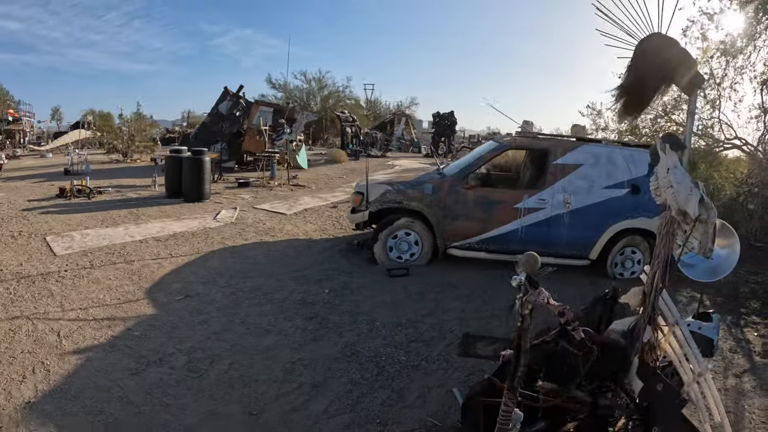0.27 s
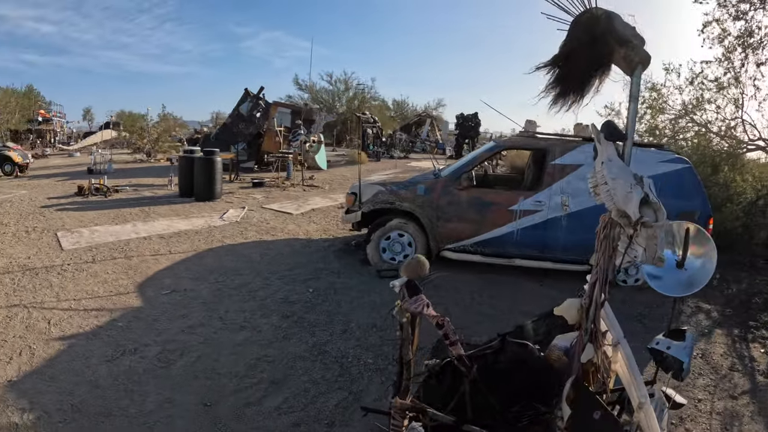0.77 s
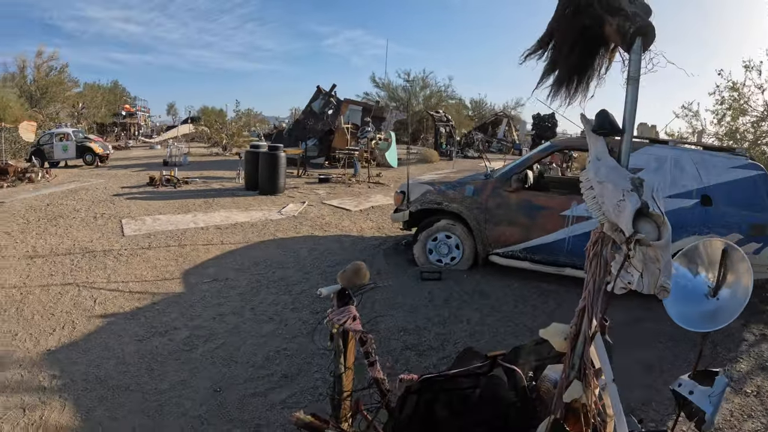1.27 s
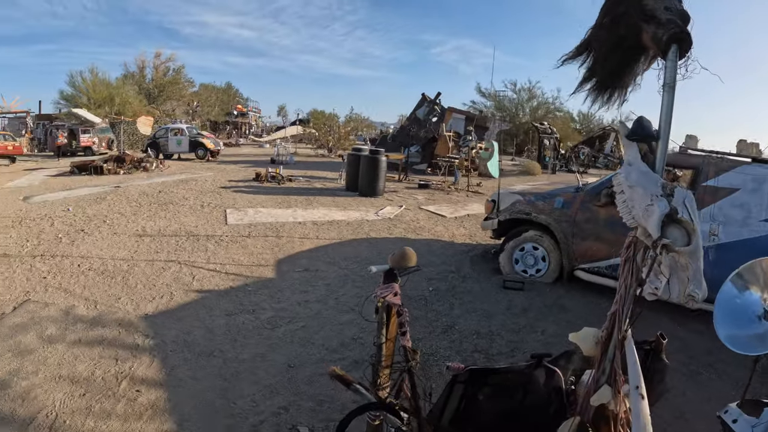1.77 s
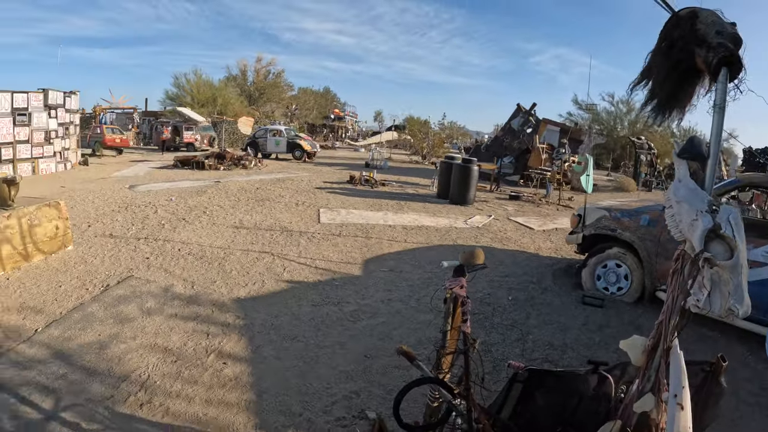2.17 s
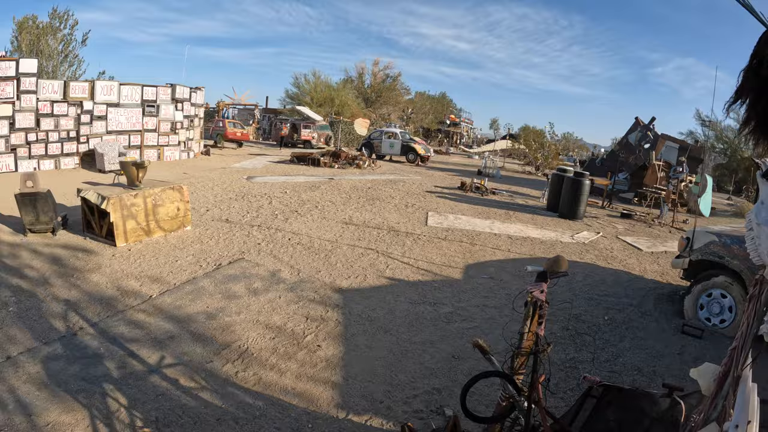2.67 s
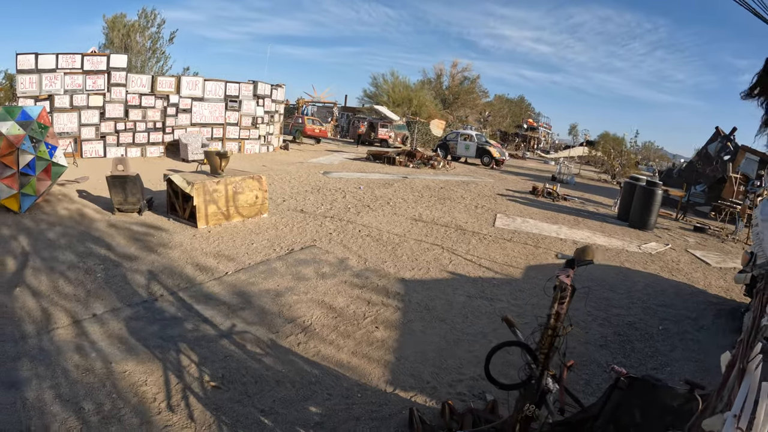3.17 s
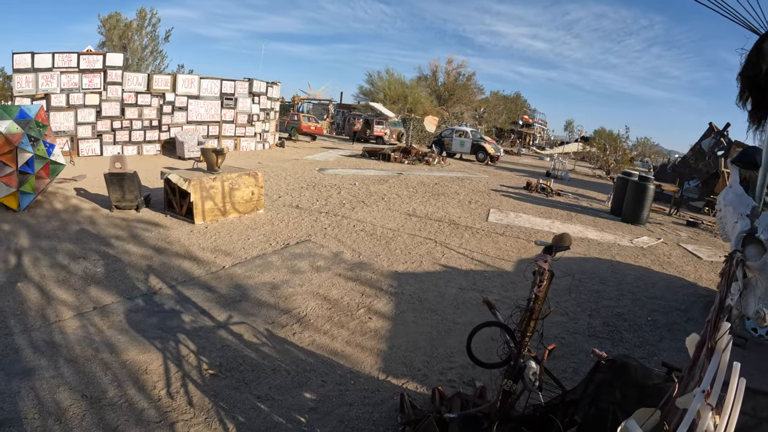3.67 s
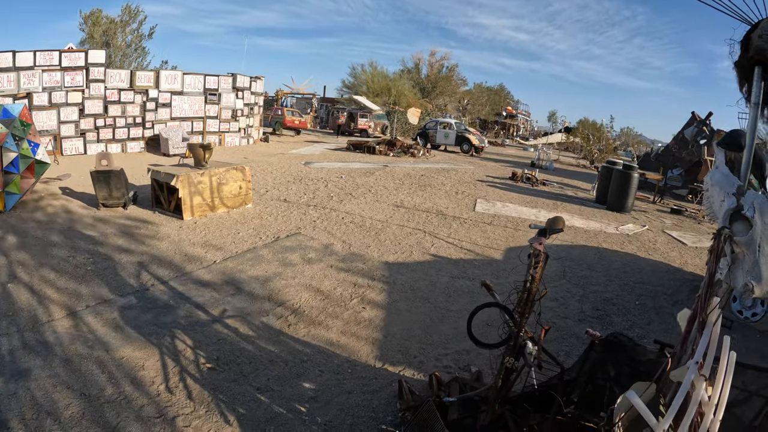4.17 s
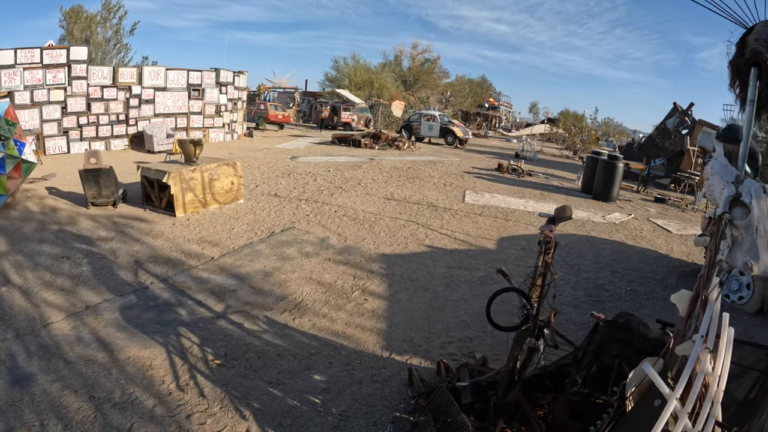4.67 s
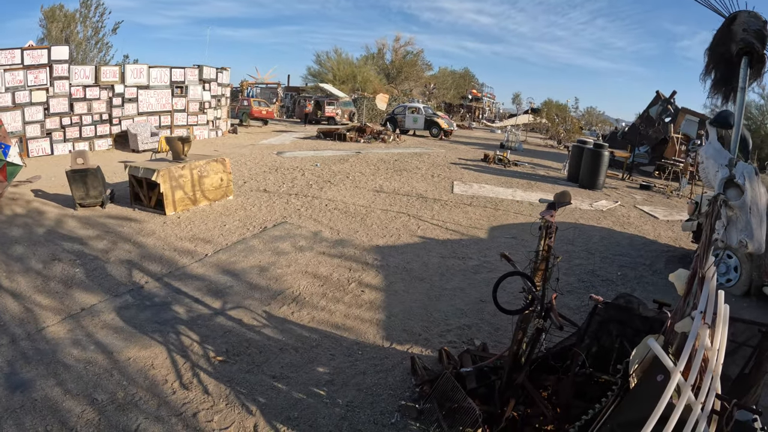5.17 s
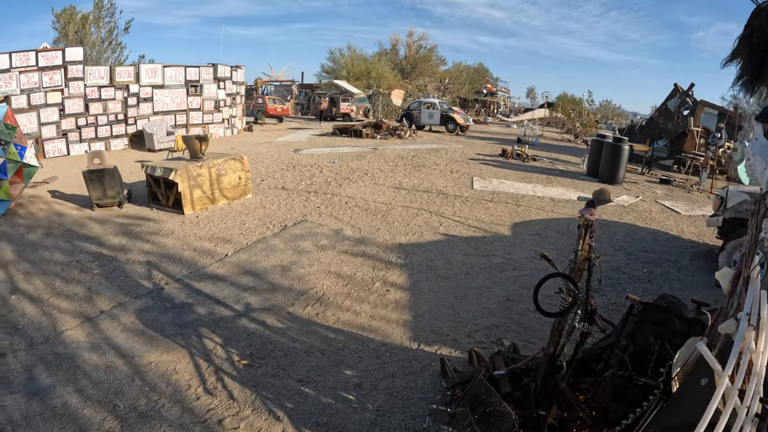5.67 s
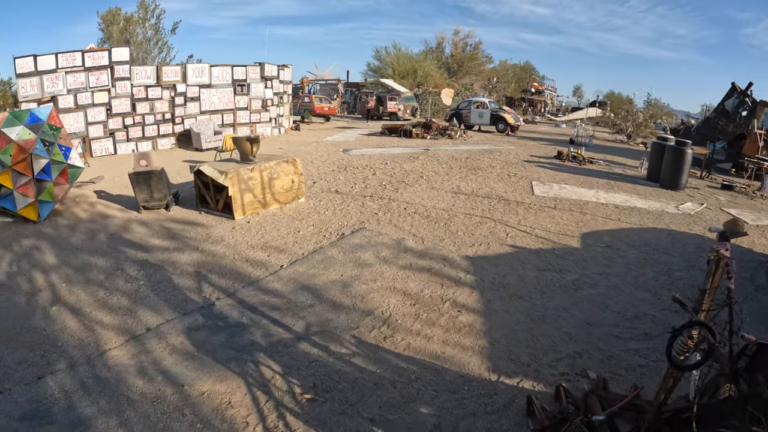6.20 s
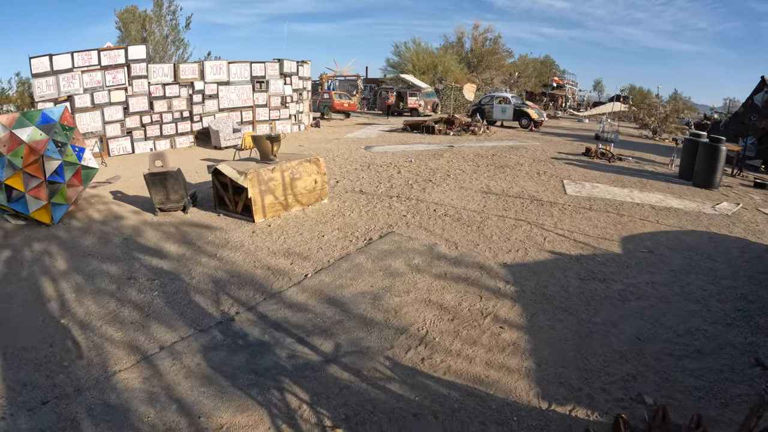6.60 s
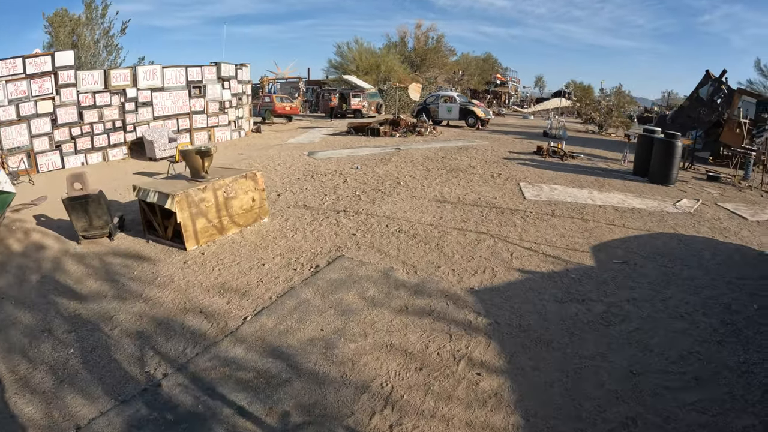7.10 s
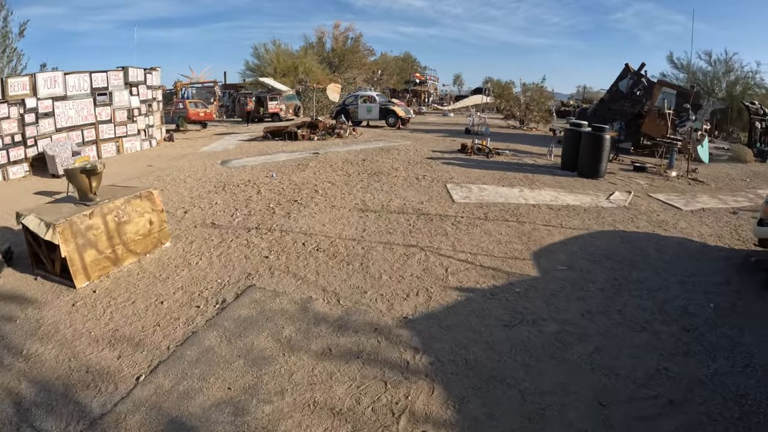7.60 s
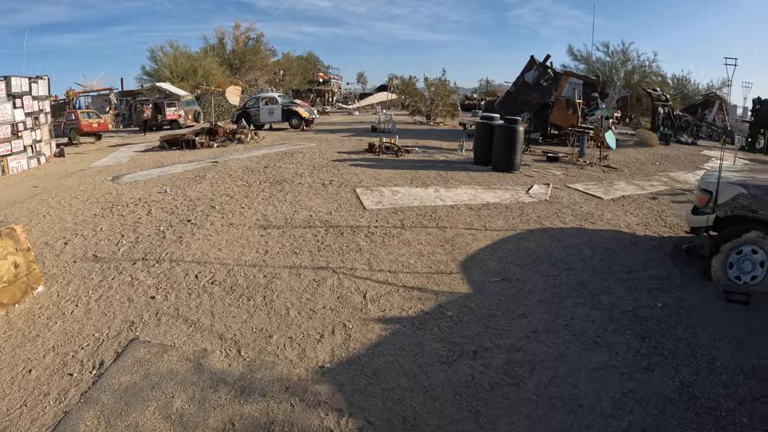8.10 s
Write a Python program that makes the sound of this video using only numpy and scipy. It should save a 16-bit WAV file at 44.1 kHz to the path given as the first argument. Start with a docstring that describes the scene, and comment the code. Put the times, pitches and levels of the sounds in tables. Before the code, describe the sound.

Someone walks slowly on gritty desert gravel, stones clicking underfoot, as low wind buffets the microphone and a bird calls sparsely.

```python
"""Someone walks slowly over dry desert gravel with a hand-held camera; gusts buffet its microphone.
From the start the wind rumbles (low noise), soles scuff the grit (clumped impulses) and small hard things
clack and click (noise bursts, ringing modes), most densely at first. After a second eddies slap the
microphone (short pressure swings). From two seconds on a bird chips now and then (gliding tones) and a
dragged sole rasps (noise bands); later come a faint far twitter and two thin whistles, over steady air noise."""
import sys
import numpy as np
from scipy import signal
from scipy.fft import rfft, irfft, next_fast_len
from scipy.io import wavfile
from scipy.ndimage import uniform_filter1d, map_coordinates

SR = 44100
rng = np.random.default_rng(int(sys.argv[2]) if len(sys.argv) > 2 else 0)


def waveform_to_disk(signal):
    """Save audio, clipped to [-1, 1], as 16-bit WAV at the path in sys.argv[1]."""
    frames = np.transpose(np.atleast_2d(signal))
    scaled = np.clip(frames, -1, 1) * 32767
    samples = np.round(scaled).astype(np.int16)
    wavfile.write(sys.argv[1], SR, samples)


N = 368058


def amp(db):
    """Decibels to an amplitude ratio."""
    return 10 ** (np.asarray(db) / 20)


def unit(x):
    """Normalisation to rms 1."""
    return x / np.sqrt(np.mean(x ** 2) + 1e-20)


def along(points, hz):
    """Interpolation of (Hz, value) points on a logarithmic frequency axis."""
    f, v = np.transpose(points)
    return np.interp(np.log(hz + 1), np.log(f + 1), v)


def curves(rows):
    """Linear interpolation in time: one value per sample for each column after the time."""
    s, *cols = np.transpose(rows)
    return [np.interp(np.arange(N) / SR, s, c) for c in cols]


def wobble(rate):
    """Band-limited random modulation: a smooth curve through rate random knots a second."""
    knots = rng.standard_normal(int(N * rate / SR) + 4)
    return map_coordinates(knots, [np.arange(N) * rate / SR])


def filtered(x, response):
    """Linear filtering: the spectrum of x times a response of frequency."""
    m = next_fast_len(len(x) + 8192)
    return irfft(rfft(x, m) * response(np.fft.rfftfreq(m, 1 / SR)), m)[:len(x)]


def coloured(x, spectrum):
    """Spectral shaping of x by (Hz, dB) points, at rms 1."""
    return unit(filtered(x, lambda hz: amp(along(spectrum, hz))))


def band(size, centre_hz, octaves):
    """Band-limited noise: a bell on the octave axis, at rms 1."""
    def bell(hz):
        return np.exp(-.5 * (np.log2((hz + 1) / centre_hz) / octaves) ** 2)
    return unit(filtered(rng.standard_normal(size), bell))


def steady(x, seconds):
    """Automatic levelling: division by the running rms evens out swells slower than the window."""
    size = max(int(seconds * SR), 8)
    power = uniform_filter1d(uniform_filter1d(x * x, size), size)
    return x / np.sqrt(np.abs(power) + 1e-12)


def add(track, s, sound):
    """Superposition: mix a sound into the track at s seconds."""
    part = track[max(round(s * SR), 0):][:len(sound)]
    part += sound[:len(part)]


def grains(rate, spread_db):
    """Shot noise: random impulses, on average rate a second, with a log-normal spread of size."""
    hits = rng.random(N) < rate / SR
    return hits * rng.standard_normal(N) * amp(spread_db * rng.standard_normal(N))


def swell(s, hold_s, attack_s, release_s):
    """Exponential envelope with two time constants: rises to 1 at s, holds and dies away."""
    t = np.arange(N) / SR - s
    rise = np.minimum(t, 0) / attack_s
    fall = np.maximum(t - hold_s, 0) / release_s
    return np.exp(np.maximum(rise - fall, -20))


def note(length, start_hz, end_hz, rough, overtones_db=()):
    """Harmonic tone with frequency modulation: a quick glide that settles, with a tremor in its pitch."""
    u = np.linspace(0, 1, max(int(length * SR), 64))
    tremor = unit(uniform_filter1d(rng.standard_normal(len(u)), size=40))
    glide_hz = end_hz + (start_hz - end_hz) * (1 - u) ** 2
    phase = 2 * np.pi * np.cumsum(glide_hz * (1 + rough * tremor)) / SR
    voice = np.sin(phase) + sum(amp(db) * np.sin(k * phase) for k, db in enumerate(overtones_db, 2))
    return np.sqrt(np.abs(np.sin(np.pi * u))) * voice


def wind():
    """Turbulence: large eddies rumble with the wind; gusts shed smaller ones in sharper flurries."""
    # Wind rumble apart from gusts. Each row: time in seconds, rms level in dB.
    wind_rows = [(0.0, -23), (0.04, -20), (0.6, -22), (0.76, -27), (0.93, -23), (1.04, -20.5), (2.0, -18),
                 (2.46, -23), (3.16, -19), (4.55, -20.5), (5.02, -17.5), (5.07, -29), (5.13, -17.5),
                 (5.46, -27.5), (5.67, -17), (5.95, -38), (6.04, -19), (6.83, -28), (7.25, -17),
                 (7.41, -23.5), (7.65, -19), (7.84, -34.5), (8.03, -35.5), (8.21, -26.5), (8.35, -41)]
    # Gusts at the microphone. Each row: start of the hold in seconds, hold in seconds, buffet level in dB,
    # sharpness in dB (small eddies against the buffet).
    gust_rows = [(0.169, 0.041, -20.5, -16), (0.24, 0.13, -32.5, -15.5), (0.575, 0.02, -29.5, -27),
                 (0.941, 0.25, -32.5, -10.5), (1.269, 0.079, -24, -11), (1.363, 0.05, -27.5, -11),
                 (1.42, 0.055, -20.5, -8.5), (1.5, 0.022, -22, -15), (1.554, 0.011, -23.5, -4),
                 (1.667, 0.041, -30, -11), (1.761, 0.02, -20, -10.5), (1.808, 0.03, -23.5, -9.5),
                 (1.964, 0.024, -21, -10.5), (2.01, 0.038, -24, -13.5), (2.063, 0.11, -26.5, -24),
                 (2.152, 0.028, -20, -12), (2.391, 0.062, -26.5, -22.5), (2.716, 0.15, -33.5, -29),
                 (2.884, 0.012, -22, -29.5), (3.032, 0.057, -20.5, -10), (3.138, 0.037, -21.5, -13.5),
                 (3.239, 0.033, -22.5, -14), (3.359, .1, -28.5, -40), (3.544, 0.47, -31.5, -29),
                 (3.693, 0.0056, -22, -16), (3.835, 0.07, -24.5, -19), (4.168, 0.18, -31.5, -24),
                 (4.361, 0.18, -26, -27), (4.638, 0.019, -25, -9), (4.835, 0.054, -21, -14),
                 (4.954, 0.041, -22.5, -11), (5.096, 0.024, -32.5, -23), (5.18, 0.02, -35.5, -21),
                 (5.273, 0.009, -29.5, -9.5), (5.585, 0.0082, -28, -25), (5.692, 0.038, -28, -25),
                 (6.129, 0.11, -23, -14), (6.222, 0.061, -21, -5.5), (6.293, 0.073, -20, -15),
                 (6.39, 0.041, -25, -22), (7.028, 0.18, -25.5, -23), (7.188, 0.11, -19.5, -15.5),
                 (7.485, 0.16, -25.5, -29)]
    # Shape of the rumble spectrum. Each row: frequency in Hz, relative density in dB.
    rumble_shape = [(5, -4), (18, -2), (30, 3), (60, -3), (105, -4), (140, -11), (220, -45), (400, -120)]
    # Eddy sizes. Each row: centre in Hz, level in dB against the buffet, factor on the sharpness,
    # flutter in dB per unit of the flutter curve.
    eddy_rows = [(152.8, -4, -0.2, 5.5), (246, -1.5, 0.2, 5), (400, -1, 0.5, 5), (750, -2, 1.24, 6.5),
                 (1020, -5, 1.32, 9), (1950, -25, 3.5, 6)]
    attack_s, release_s = 0.013, 0.03
    small_eddies_fade = 0.86  # dB of sharpness lost per dB of a gust's fade
    usual_wind_db, breeze_db, breeze_growth = -22, -36.5, 1.28  # growth in dB per dB of wind
    breeze_sharp_db = -28.5
    levelling_cycles = 17  # large eddies keep longer flurries than small ones

    wind_db, = curves(wind_rows)
    # between gusts the buffeting follows the wind
    breeze_db = breeze_db + breeze_growth * (wind_db - usual_wind_db)
    # the strongest gust of the moment sets the buffeting and its sharpness
    gust_db, gust_sharp_db = np.full(N, -200.), np.zeros(N)
    for s, hold_s, db, sharp_db in gust_rows:
        fade_db = 20 * np.log10(swell(s, hold_s, attack_s, release_s))
        stronger = db + fade_db > gust_db
        gust_sharp_db = np.where(stronger, sharp_db + small_eddies_fade * fade_db, gust_sharp_db)
        gust_db = np.maximum(gust_db, db + fade_db)
    gust_sharp_db = uniform_filter1d(gust_sharp_db, size=SR // 100)  # one gust blends into the next

    rumble = steady(coloured(rng.standard_normal(N), rumble_shape), 0.091)
    out = np.hypot(amp(wind_db), amp(gust_db - 3)) * rumble  # gusts rumble 3 dB below their buffet
    flurry = unit(.6 * wobble(25) + .8 * wobble(70) + wobble(240))
    flurry = 2 * np.tanh(flurry / 1.8)  # limits the extremes
    for hz, db, share, flutter_db in eddy_rows:
        flutter = 0.89 * flurry + 0.51 * wobble(200)
        eddies = band(N, hz, octaves=0.49) * amp(flutter_db * flutter)
        breeze = amp(breeze_db + share * breeze_sharp_db)
        gust = amp(gust_db + share * gust_sharp_db)
        out += amp(db) * np.hypot(breeze, gust) * steady(eddies, levelling_cycles / hz)
    return out


def slaps():
    """Vortex passage: a tight eddy crosses the microphone port as one brief swing of pressure."""
    # Strongest single eddies. Each row: centre in seconds, envelope peak in dB, pitch in Hz.
    slap_rows = [(1.294, -10.5, 440), (1.429, -11, 400), (1.44, -8, 480), (1.455, -14, 530),
                 (1.476, -8, 650), (1.538, -15.5, 660), (1.561, -22, 520), (1.569, -20, 910),
                 (1.702, -19.5, 473), (1.751, -20, 480), (1.766, -25, 470), (1.78, -10, 550),
                 (1.805, -17.5, 630), (1.824, -18, 510), (1.837, -27, 520), (1.867, -13.5, 460),
                 (1.966, -18, 480), (1.977, -14, 540), (2.013, -19, 730), (2.167, -12.5, 460),
                 (2.779, -20, 394), (2.892, -20, 400), (3.046, -10.5, 630), (3.076, -22, 483),
                 (3.148, -16, 500), (3.176, -15, 480), (3.245, -16, 520), (3.689, -22, 484),
                 (3.7, -10, 400), (3.743, -28, 400), (3.86, -31, 750), (3.886, -12.5, 450),
                 (3.969, -24, 446), (4.237, -30, 1100), (4.37, -12, 244), (4.449, -19.5, 410),
                 (4.537, -22, 420), (4.647, -30, 450), (4.678, -15, 480), (4.797, -24, 1400),
                 (4.836, -20, 420), (4.893, -16, 960), (4.9, -15.5, 520), (4.951, -24, 1200),
                 (4.971, -13, 450), (4.996, -19, 654), (5.04, -25, 1140), (5.206, -24.5, 400),
                 (5.279, -21.5, 576), (5.543, -25.5, 464), (5.596, -19.5, 400), (5.69, -19, 418),
                 (6.157, -10, 540), (6.234, -20, 700), (6.366, -13.5, 593), (6.438, -23.5, 1200),
                 (7.141, -15, 377), (7.263, -11, 455), (7.275, -13, 507), (7.58, -25, 520)]
    life = 0.27  # width of the envelope in cycles
    out, t = np.zeros(N), np.arange(-SR // 50, SR // 50) / SR
    for (s, peak_db, hz), phase in zip(slap_rows, rng.random(len(slap_rows))):
        cycles = t * hz
        swing = np.cos(2 * np.pi * (cycles + phase)) / np.cosh(cycles / life)
        add(out, s + t[0], amp(peak_db) * swing)
    return out


def gravel():
    """Granular friction: each step grinds coarse stones and fine grit, whose grains slip in clumps."""
    # Steps and shuffles. Each row: start of the hold in seconds, hold in seconds,
    # scuff in dB and fine grit in dB, both before the gains below.
    step_rows = [(0.01, 0.53, -56, -56.5), (0.503, 0.5, -51.5, -55.5), (0.98, 0.23, -46.5, -51),
                 (1.225, 0.18, -49.5, -51), (1.643, .08, -56.5, -59.5), (1.765, 0.12, -51.5, -59.5),
                 (2.16, 0.096, -52, -64), (2.352, 0.26, -53.5, -62), (2.767, 0.22, -54, -61.5),
                 (3.038, 0.31, -56.5, -63.5), (3.754, 0.28, -72, -62), (4.305, 0.029, -68, -57),
                 (4.372, 0.1, -53.5, -58.5), (4.65, .33, -55.5, -63.5), (5.23, 0.095, -60, -62.5),
                 (5.467, 0.14, -61, -63), (5.67, 0.19, -56.5, -59), (6.026, 0.15, -54, -59.5),
                 (6.174, 0.18, -56.5, -69), (6.641, 0.069, -55.5, -64), (6.811, 0.15, -52, -60.5),
                 (7.004, 0.365, -56, -64), (7.5, 0.17, -53.5, -70), (8.026, 0.092, -56.5, -70),
                 (8.203, 0.1, -48.5, -59.5)]
    # Spectrum of the coarse scuff. Each row: frequency in Hz, relative density in dB.
    scuff_shape = [(150, -35.5), (400, 0), (850, 0.5), (1400, -1), (2000, -6), (2600, -6), (3400, -12.5),
                   (4500, -23.5), (7000, -34), (12000, -51)]
    # Spectrum of the fine grit. Each row: frequency in Hz, relative density in dB.
    grit_shape = [(1200, -41.5), (2400, -0.5), (3200, 1), (4300, -2.5), (6000, -9.5), (8000, -18),
                  (10000, -30), (13000, -44.5)]
    scuff_gain_db, grit_gain_db = 9.0, 4.0
    attack_s, release_s = 0.04, 0.077  # the weight comes on, the stones settle
    # gravel creeps under the walker's weight between steps
    on_stones, on_grit = np.full(N, amp(-62)), np.full(N, amp(-65.5))
    for s, hold_s, coarse_db, fine_db in step_rows:
        weight = swell(s, hold_s, attack_s, release_s)
        on_stones = np.maximum(on_stones, amp(coarse_db) * weight)
        on_grit = np.maximum(on_grit, amp(fine_db) * weight)
    clumps = wobble(55)
    coarse = coloured(grains(rate=3200, spread_db=0.0) * amp(clumps), scuff_shape)
    fine = coloured(grains(rate=8300, spread_db=2.5) * amp(2.1 * clumps + 0.7 * wobble(120)), grit_shape)
    return amp(scuff_gain_db) * on_stones * coarse + amp(grit_gain_db) * on_grit * fine


def rasps():
    """Stick-slip friction: a dragged sole chatters over the stones and lets go."""
    # Brief rasps. Each row: centre in seconds, length in seconds (between the 1/e points),
    # level in dB before the chatter, centre frequency in Hz.
    rasp_rows = [(2.24, 0.081, -50.5, 2360), (2.446, 0.023, -44, 1700), (2.836, 0.072, -43, 1110),
                 (2.928, 0.042, -49, 2080), (3.282, 0.052, -32, 1000), (3.312, 0.039, -32.5, 1260),
                 (4.546, 0.054, -39, 1230), (5.057, 0.038, -46.5, 1680), (6.046, 0.078, -40.5, 1600),
                 (6.127, 0.086, -45.5, 2380), (6.235, 0.04, -39.5, 1460), (6.281, 0.047, -44, 1240),
                 (6.927, 0.064, -39.5, 1000), (7.867, 0.012, -40.5, 1100), (8.197, 0.022, -34.5, 1300),
                 (8.256, 0.15, -40, 800)]
    out, t = np.zeros(N), np.arange(-SR // 6, SR // 6) / SR
    chatter = amp(3.2 * wobble(320) - 1.3)
    for s, length, db, hz in rasp_rows:
        bell = np.exp(-(2 * t / length) ** 2)
        add(out, s + t[0], amp(db) * bell * band(len(t), hz, octaves=.68))
    return out * chatter


def clacks():
    """Impact excitation of modes: a quick chatter of contacts cracks and rings briefly."""
    # Hard clacks underfoot. Each row: start in seconds, reference level in dB, knock in dB,
    # brightness in dB, ring in dB against the reference, pitch of the ring in Hz.
    clack_rows = [(0.058, -34, -5, -18, -19, 3240), (0.082, -39, -16, -22, -8, 3020),
                  (0.161, -39.5, -21, -11, -11, 4200), (0.273, -37.5, -22, -13, -13, 4370),
                  (0.328, -45.5, -20, -13, -18, 4280), (0.422, -44.5, -7, -6, -20, 3170),
                  (0.518, -33, -18, -14, -18, 3130), (0.541, -31, -4, -25, -10, 3140),
                  (0.636, -37, -28, -14.5, -9, 3450), (0.697, -43, -14, -19, -11, 3150),
                  (0.736, -35, -9, -15.5, -21, 3200), (0.856, -26, -1, -17, -11.5, 3120),
                  (0.959, -35.5, -12, -9, -19, 3130), (1.028, -30.5, -34, -18, -20, 3200),
                  (1.071, -28.5, -24, -21, -16, 3060), (1.139, -22.5, -4.5, -26.5, -21, 3150),
                  (1.177, -29, -23, -22, -16, 3090), (1.275, -35.5, -22, -13.5, -14, 3430),
                  (1.302, -48, -19, -6, -13, 3110), (1.627, -38.5, 8.5, -25, -24, 3130),
                  (1.675, -44, -12.5, -4, -19, 3110), (1.808, -51, -6, -3, -11, 3110),
                  (1.925, -30, -3, -21.5, -10.5, 3370), (2.275, -32.5, 4, -20, -8, 2960),
                  (2.352, -36, -8, -32, -14, 3120), (2.481, -37.5, -2, -29, -18, 3160),
                  (2.731, -28, 3.5, -18, -10.5, 3170), (3.057, -34.5, -5, -24, -11, 3406),
                  (5.107, -47.5, 3, -1, -17, 3070), (5.738, -34.5, 3, -28, -11.5, 3480),
                  (6.016, -38, -16, -28.5, -19, 3020), (6.067, -37.5, -10, -20.5, -11, 3140),
                  (6.674, -43.5, -7, -14.5, -12, 3090), (6.807, -32.5, 9, -41, -22, 3100),
                  (7.179, -26, -2.5, -20.5, -10.5, 3010), (7.493, -38.5, -1, -32, -17, 3070),
                  (7.631, -34.5, 1.5, -19.5, -14, 3060), (8.044, -50, 1, -6, -17, 3120),
                  (8.186, -42, -1, -25, -17, 3140), (8.26, -32.5, 10, -33, -19, 3080)]
    # Modes of a clack. Each row: multiple of its pitch, mean level in dB before normalising, t60 in seconds.
    mode_rows = [(.68, -7.5, 0.022), (0.801, -2, 0.026), (.95, -0.5, 0.03), (1.001, 4.5, 0.05),
                 (1.08, -1.5, 0.028), (1.129, -4.5, 0.034), (1.42, -18, 0.03), (1.72, -15.5, 0.034),
                 (2.22, -22, 0.035), (2.42, -22.5, 0.038)]
    crack_db = -9  # crack against the reference level
    rise_s, hold_s, chatter_t60 = 0.0021, 0.0051, 0.074  # the hold includes the rise
    spread_db, level_spread_db, detune = 3.0, 1.6, .005
    ring_blur_hz, ring_top_hz = 80, 7500  # rattling contact widens modes; soft contacts drive little higher
    lead_s, head = .004, SR // 55  # silence ahead; samples over which levels are set
    low_pass = signal.butter(N=4, Wn=ring_top_hz, fs=SR, output="sos")
    out, t = np.zeros(N), np.arange(SR // 4) / SR
    for s, db, knock_db, bright_db, ring_db, ring_hz in clack_rows:
        decay = amp(-60 * np.maximum(t - lead_s - hold_s, 0) / chatter_t60)
        force = np.clip((t - lead_s) / rise_s, 0, 1) * decay
        contacts = force * rng.standard_normal(len(t)) * amp(spread_db * rng.standard_normal(len(t)))
        colour = [(500, -24.0), (1300, knock_db), (2200, knock_db + 4.5), (3300, 2.0), (4500, -8.0),
                  (6500, bright_db + 2.0), (9000, bright_db - 10.5), (11000, bright_db - 20),
                  (13000, bright_db - 31.5)]
        crack = coloured(contacts, colour)
        # every clack rings the modes at slightly new pitches and strengths
        chance = rng.standard_normal((len(mode_rows), 2))
        # a random walk in phase gives each mode its width
        steps = rng.standard_normal((len(mode_rows), len(t)))
        blur = np.cumsum(steps, axis=1) * np.sqrt(2 * np.pi * ring_blur_hz / SR)
        ring = np.zeros(len(t))
        for (k, level, t60), (a, b), phase in zip(mode_rows, chance, blur):
            mode_hz = ring_hz * k * (1 + detune * b)
            mode_amp = amp(level + level_spread_db * a - 60 * t / t60)
            ring += mode_amp * np.sin(2 * np.pi * mode_hz * t + phase)
        # the first contact sets the ring going; later ones keep it alive
        strikes = 0.036 * contacts + (np.arange(len(t)) == round(lead_s * SR))
        ring = signal.fftconvolve(strikes, ring * (1 - np.exp(-t / .002)))[:len(t)]
        ring = signal.sosfilt(low_pass, ring)
        crack = amp(db + crack_db) * crack / np.std(crack[:head])
        ring = amp(db + ring_db) * ring / np.std(ring[:head])
        add(out, s - lead_s, crack + ring)
    return out


def pebbles():
    """Damped impact noise: a pebble tips, rattles against its neighbour and settles."""
    # Single clicking pebbles. Each row: start in seconds (the sound begins one rise time earlier),
    # peak level in dB, pitch in Hz.
    pebble_rows = [(0.183, -43, 3600), (0.99, -33, 3400), (1.116, -32, 4600), (1.763, -42, 3230),
                   (2.312, -35, 3100), (2.418, -42, 2900), (2.795, -35.5, 2900), (2.926, -31, 2500),
                   (2.946, -34, 2500), (4.315, -42, 3250), (4.335, -47, 3700), (4.396, -43, 4200),
                   (4.451, -41, 3760), (5.42, -49, 4000), (5.507, -39.5, 3650), (5.688, -41, 3200),
                   (6.468, -48, 4300), (6.689, -44, 3100)]
    rise_s, t60, spread_db = .0015, 0.035, 4
    out, t = np.zeros(N), np.arange(SR // 12) / SR
    knots = t[::SR // 400]  # the rattle changes about 400 times a second
    for s, peak_db, hz in pebble_rows:
        rattle = amp(spread_db * np.interp(t, knots, rng.standard_normal(len(knots))))
        envelope = (1 - np.exp(-t / rise_s)) * amp(-60 * t / t60)
        click = band(len(t), hz, octaves=0.33) * rattle * envelope
        add(out, s - rise_s, amp(peak_db) * click / np.abs(click).max())
    return out


def bird():
    """Frequency-modulated tones: short, slightly hoarse chips nearby, and thin whistles farther off."""
    # Chips. Each row: start in seconds, length in seconds, start pitch in Hz, end pitch in Hz,
    # level of the fundamental in dB.
    chip_rows = [(2.059, 0.03, 2800, 2610, -39), (2.091, 0.034, 2540, 2540, -39),
                 (3.897, 0.036, 2584, 2560, -47.5), (3.94, 0.06, 2715, 2590, -48.5),
                 (4.129, 0.068, 2616, 2560, -41.5)]
    # Thin high whistles. Each row: start in seconds, length in seconds, pitch in Hz, level in dB.
    whistle_rows = [(5.58, .1, 8500, -79), (6.14, .068, 8620, -70)]
    out = np.zeros(N)
    for s, length, start_hz, end_hz, db in chip_rows:
        add(out, s, amp(db) * note(length, start_hz, end_hz, rough=.023, overtones_db=[-12, -30]))
    for s, length, hz, db in whistle_rows:
        add(out, s, amp(db) * note(length, hz, hz, rough=.004))
    return out


def twitter():
    """Random frequency modulation: a distant run of quick, hoarse notes."""
    # Notes. Each row: start in seconds, pitch in Hz, level in dB before the echoes.
    twitter_rows = [(5.075, 3680, -54), (5.16, 5960, -68), (5.165, 3600, -56), (5.275, 4800, -61),
                    (5.272, 4040, -51), (5.325, 3780, -54), (5.445, 4000, -52), (5.455, 3650, -57),
                    (5.565, 2750, -47.5), (5.88, 4900, -53)]
    out = np.zeros(N)
    for s, hz, db in twitter_rows:
        add(out, s, amp(db) * note(0.027, hz, hz, rough=.055))
    return out


def yard(x, t60):
    """Diffuse reflection: scattered echoes from cars, boards and bushes as a decaying noise tail."""
    t = np.arange(SR // 2) / SR
    tail = rng.standard_normal(len(t)) * amp(-60 * t / t60) * (t > .008)
    return signal.fftconvolve(x, tail / np.linalg.norm(tail))[:N]


def background_air():
    """Stationary coloured noise: the steady hush of the air."""
    # Spectrum of the air. Each row: frequency in Hz, relative density in dB.
    air_shape = [(100, -8), (300, 6), (600, -8), (1300, -10.5), (2000, -7.5), (3200, -11.5), (4500, -18.5),
                 (6500, -28.5), (8500, -33.5), (11000, -50), (14000, -68)]
    return amp(-53.5) * coloured(rng.standard_normal(N), air_shape)


def scene():
    """Superposition of direct and reflected sound: the far twitter arrives only as scattered echoes."""
    chips, knocks = bird(), clacks() + pebbles()
    echoes = amp(-6.5) * yard(chips, t60=0.31) + amp(-9) * yard(knocks, t60=0.15)
    echoes += yard(twitter(), t60=0.13)
    close = wind() + slaps() + gravel() + rasps() + knocks + chips
    return (close + echoes + background_air())[None]


def record(dry):
    """Band limiting: the camera keeps nothing from 13.8 kHz up."""
    return np.array([filtered(x, lambda hz: hz < 13800) for x in dry])


dry = scene()
out = record(dry)
waveform_to_disk(out)
```